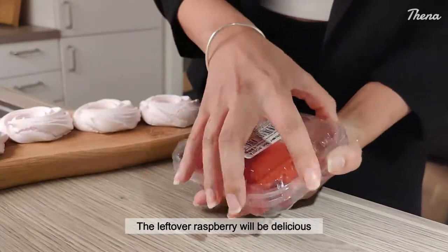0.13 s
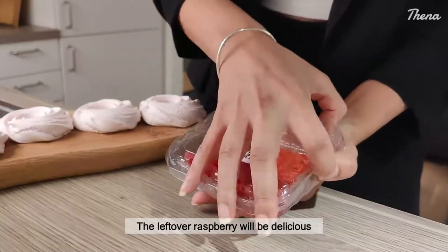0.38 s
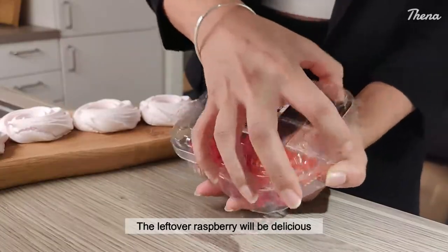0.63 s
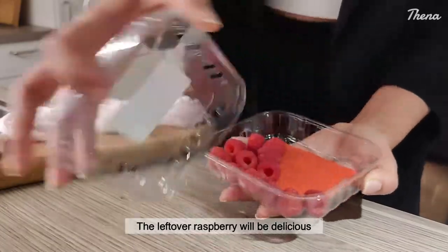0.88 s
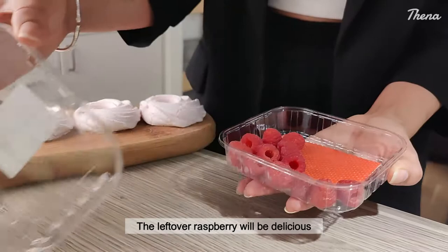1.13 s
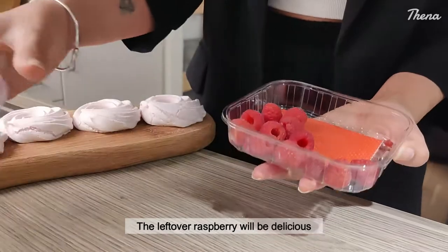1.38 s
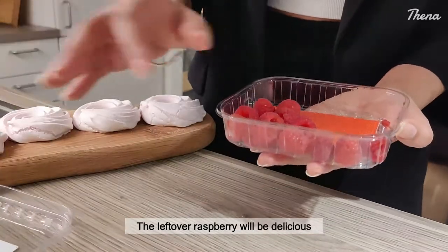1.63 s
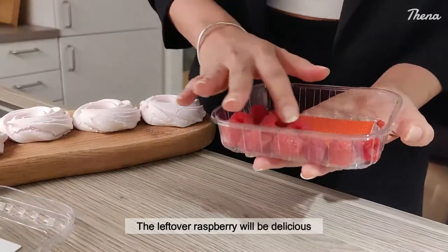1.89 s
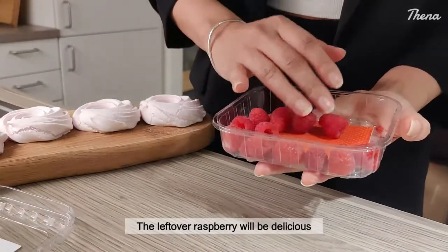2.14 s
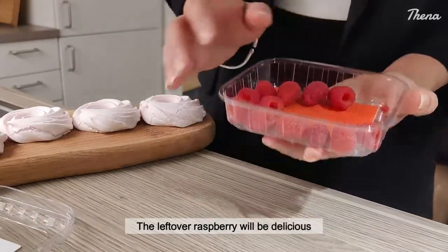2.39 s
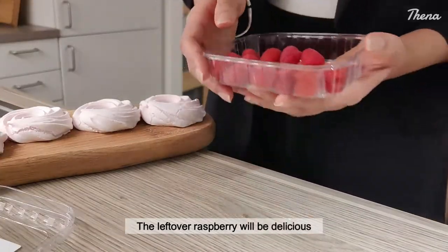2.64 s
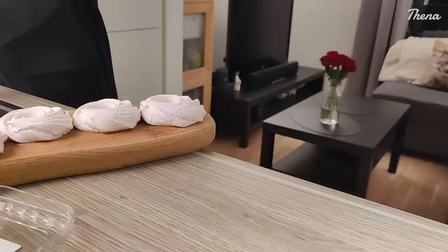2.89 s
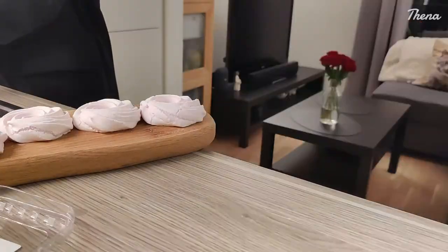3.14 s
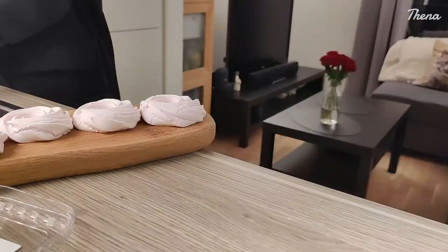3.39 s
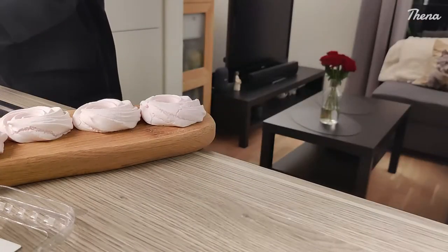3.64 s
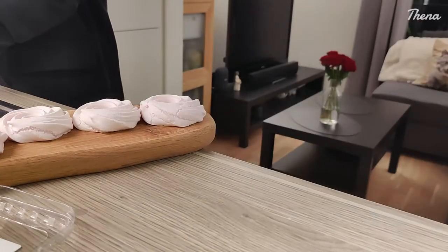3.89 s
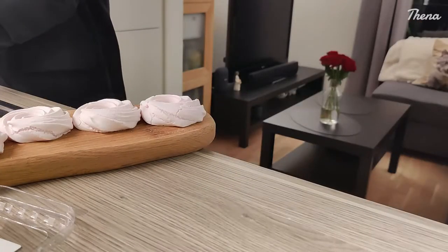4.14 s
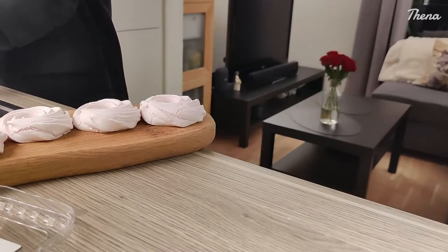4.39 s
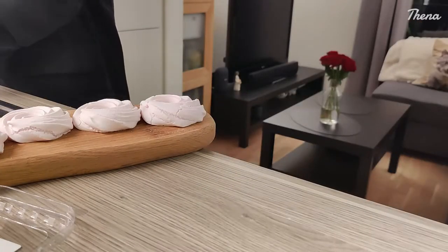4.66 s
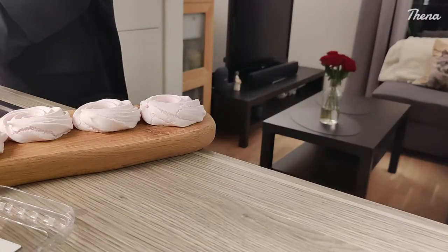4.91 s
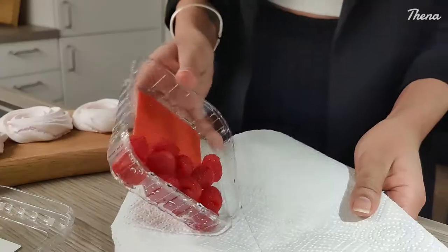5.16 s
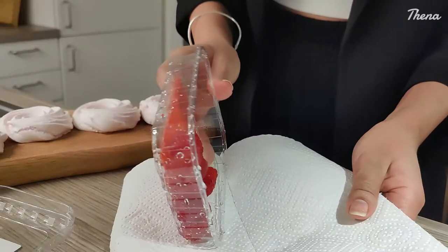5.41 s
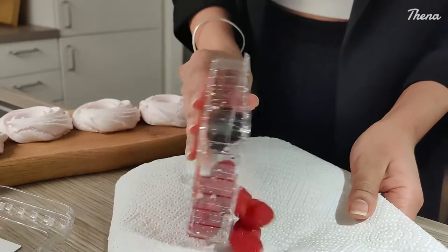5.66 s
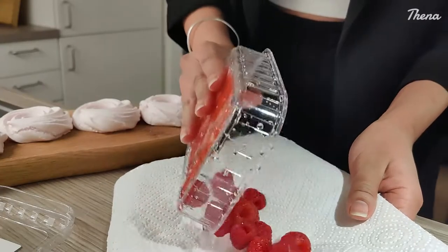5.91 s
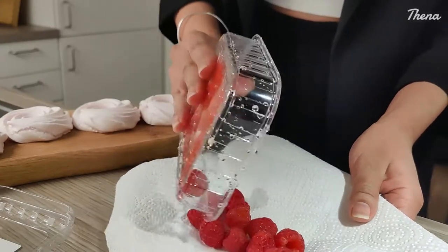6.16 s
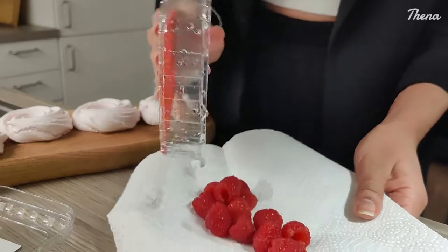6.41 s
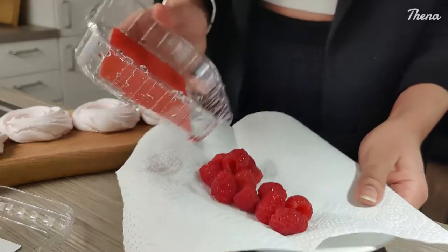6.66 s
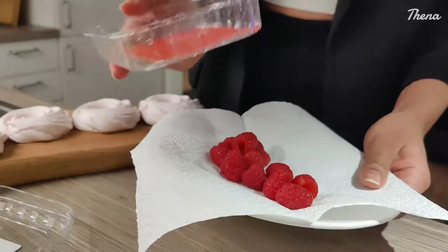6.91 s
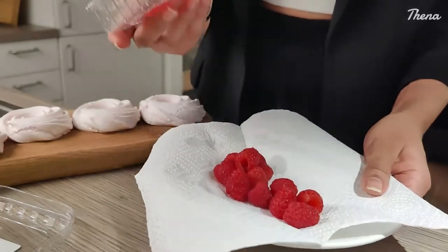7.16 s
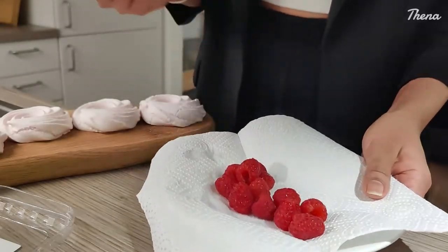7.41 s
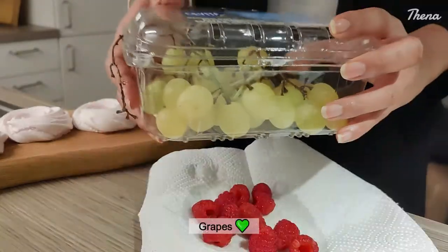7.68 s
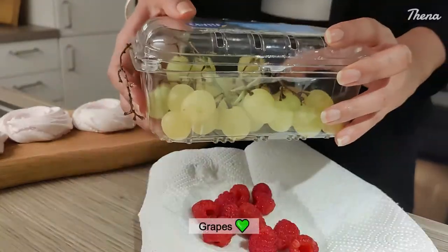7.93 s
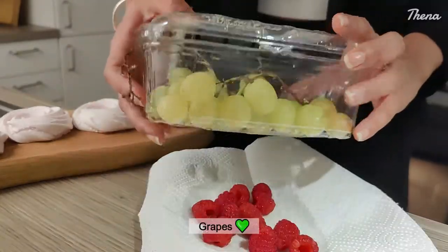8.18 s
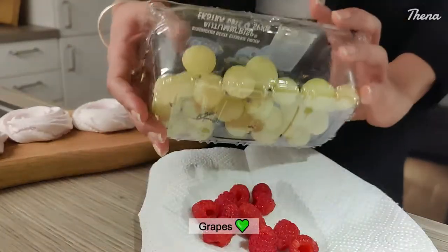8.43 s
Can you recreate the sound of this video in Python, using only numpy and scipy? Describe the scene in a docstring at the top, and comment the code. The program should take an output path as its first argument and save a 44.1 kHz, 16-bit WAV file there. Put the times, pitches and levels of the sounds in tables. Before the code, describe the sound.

Close stereo microphone in a small home kitchen with low appliance hum and faint hiss. Hands rustle a thin plastic berry box, its lid pops sharply, then it clatters lightly on the counter. A tap abruptly sprays into a steel sink for about two seconds, gurgling around the box. Berries drop with dull thuds onto a towel-lined plate, and finally fingers tap and rub another plastic fruit box.

```python
"""A quiet kitchen with a low hum, wavering motor tones and hiss throughout, all filtered noise and sines.
Hands brush thin plastic fruit boxes (swelling noise), lids snap open (noise bursts ringing box modes), and one
is dropped on the counter (slap plus ringing modes). Then a tap sprays into a steel sink (noise and bubble
blips), berries thud onto a plate and fingers tap a box.
Every sound is heard with a faint copy just ahead of it."""
import sys
import numpy as np
from scipy import signal
from scipy.fft import rfft, irfft, next_fast_len
from scipy.io import wavfile
from scipy.ndimage import uniform_filter1d, map_coordinates

SR = 44100
rng = np.random.default_rng(int(sys.argv[2]) if len(sys.argv) > 2 else 0)


def store_wav(level_fs):
    """Save 16-bit WAV to argv[1]."""
    pcm = np.round(np.clip(np.atleast_2d(level_fs), -1, 1) * 32767)
    wavfile.write(sys.argv[1], SR, pcm.T.astype(np.int16))


def attenuation_scalar(level_db):
    """Turn a level in dB into a linear amplitude multiplier (20 dB per decade)."""
    decades = np.asarray(level_db, float) / 20
    return 10 ** decades


N = 377055  # length in samples


def unit(x):
    """Scales a sound to rms 1."""
    return x / np.sqrt(np.mean(x ** 2) + 1e-20)


def along(points, hz):
    """Reads a curve of (Hz, value) points on a log frequency axis."""
    f, v = np.transpose(points)
    return np.interp(np.log(hz + 1), np.log(f + 1), v)


def curves(rows):
    """Gives one value per sample for each column after the time."""
    s, *cols = np.transpose(rows)
    return [np.interp(np.arange(N) / SR, s, c) for c in cols]


def wobble(rate):
    """A smooth random curve with rate knots a second."""
    knots = rng.standard_normal(int(N * rate / SR) + 4)
    return map_coordinates(knots, [np.arange(N) * rate / SR])


def swells(rows, fall_db):
    """Gain of swells (middle s, half length s, dB) that lose fall_db one half length from the middle."""
    now = np.arange(N) / SR
    return np.sqrt(sum(attenuation_scalar(db - fall_db * ((now - s) / half) ** 2) ** 2 for s, half, db in rows))


# How alike the left and right microphone ports sound. Each row: frequency in Hz, likeness from -1 to 1.
LIKENESS = [(60, 0.99), (110, 1), (200, 0.97), (380, 0.61), (700, -0.54), (1290, -0.25), (2380, 0.21),
            (4400, -0.04), (8120, 0.58), (12000, .5), (15000, 0.55)]


def paired(pair, spectrum):
    """Colours two unrelated signals and mixes them to the likeness of the two microphone ports."""
    length = pair.shape[1]
    m = next_fast_len(length + 4096)
    hz = np.fft.rfftfreq(m, 1 / SR)
    turn = np.arccos(np.clip(along(LIKENESS, hz), -1, 1)) / 2
    coloured = rfft(pair, m) * attenuation_scalar(along(spectrum, hz))
    mid, side = irfft(coloured * [np.cos(turn), np.sin(turn)], m)[:, :length]
    return np.array([mid + side, mid - side])


def rush(spectrum, patchy_db, grain_db=0, grains=300, drift_db=0):
    """Stereo noise of rms 1: small patches and slow broad drifts of random gain, plus grains both ports share."""
    z = signal.stft(rng.standard_normal((2, N)), nperseg=256)[2]
    raw = rng.standard_normal((2, *z.shape[1:]))
    field = uniform_filter1d(uniform_filter1d(raw[0], 6, 0), 8, 1)
    drift = uniform_filter1d(raw[1], size=5, axis=0)
    for _ in range(2):
        drift = uniform_filter1d(drift, size=50, axis=1)
    gain = attenuation_scalar(patchy_db * unit(field) + drift_db * unit(drift))
    pair = signal.istft(z * gain, nperseg=256)[1][:, :N]
    return unit(paired(pair * attenuation_scalar(grain_db * wobble(grains)), spectrum))


def band(x, lo_hz, hi_hz):
    """Causal band-pass."""
    return signal.sosfilt(signal.butter(4, [lo_hz, hi_hz], "band", fs=SR, output="sos"), x)


def add(track, s, sound):
    """Lays a stereo sound into the track at time s."""
    part = track[:, round(s * SR):][:, :sound.shape[1]]
    part += sound[:, :part.shape[1]]


# How long the kitchen rings. Each row: frequency in Hz, seconds to fade by 60 dB.
KITCHEN_FADE = [(300, 0.31), (2000, 0.26), (6000, 0.26), (14000, 0.3)]


def room(hit):
    """A fresh stereo noise tail for one hit; each frequency dies at its own speed."""
    hz, t, z = signal.stft(rng.standard_normal((2, SR // 2)), SR, nperseg=256)
    tail = signal.istft(z * attenuation_scalar(-60 * t / along(KITCHEN_FADE, hz)[:, None]), SR, nperseg=256)[1]
    tail = paired(tail, [(100, 0)])
    m = next_fast_len(tail.shape[1] + 2048)
    # the walls hear the object from all sides: they return its broad colour without the narrow peaks
    colour = np.sqrt(np.abs(uniform_filter1d(np.abs(rfft(hit, m)) ** 2, size=m // 60)))
    padded = np.pad(tail, ((0, 0), (300, 0)))
    answer = irfft(rfft(padded, m) * colour, m) / np.linalg.norm(tail[0])
    gather = 1 - np.exp(-(np.arange(m) / SR / 0.004) ** 2)  # reflections gather over about 4 ms
    return (answer * gather)[:, :SR * 2 // 5]


# Colour of the appliance rumble. Each row: frequency in Hz, relative strength in dB per Hz.
HUM_COLOUR = [(24, -42.5), (38, -6.5), (49, 0.5), (60, -6.5), (75, -13), (102, -2), (118, 0), (131, -6.5),
              (140, -21), (172, -13.5), (208, -31.5), (241, -28.5), (347, -44.5), (367, -44), (450, -45.5),
              (580, -80), (990, -120)]
# Colour of the hiss. Each row: frequency in Hz, relative strength in dB per Hz.
HISS_COLOUR = [(300, -19.5), (480, -8), (680, -1), (1050, -5.5), (1500, -3.5), (2070, -1.5), (2500, -7),
               (5500, -7), (7200, -2.5), (9000, -7.5), (12500, -3.6), (14400, 1), (16000, -5.5)]
# Room tone, stepping abruptly to new levels at each start.
# Each row: start in seconds, hum in dB, hiss in dB at the start, fading of the hiss in dB per second.
ROOM_TONE = [(0, -58.5, -77, 1.5), (2.861, -58.5, -81, -4), (5.14, -60, -77, 2), (7.559, -55.5, -75.5, 7)]
# Appliance motor tones. Each row: pitch in Hz, middle peak level in dB.
MOTOR_TONES = [(333.8, -92.5), (683.7, -100), (1044, -101), (2013, -105)]


def background():
    """Appliance rumble in the room's lowest modes, faint wavering motor tones and a hiss."""
    now = np.arange(N) / SR
    row = np.searchsorted([start for start, *_ in ROOM_TONE[1:]], now)
    start, hum_db, hiss_db, fading = np.transpose(ROOM_TONE)[:, row]
    motors = 0
    for hz, db in MOTOR_TONES:
        level = attenuation_scalar(db + 1.2 * wobble(8.3))
        motors = motors + level * np.sin(2 * np.pi * hz * now + 1.7 * wobble(8.3))
    hum = attenuation_scalar(hum_db) * rush(HUM_COLOUR, patchy_db=0.05)
    hiss = attenuation_scalar(hiss_db - fading * (now - start)) * rush(HISS_COLOUR, patchy_db=2.0)
    return hum + hiss + motors


# Hands brushing the boxes; each stroke swells and fades.
# Each row: strongest moment in seconds, half length in seconds, rustle in dB, rubbing in dB above the rustle.
HAND_STROKES = [(0.0, 0.073, -50, -0.8), (0.366, 0.17, -67.5, 9), (2.62, .04, -79, -23),
                (5.293, 0.11, -70, -25), (5.496, 0.037, -66.5, -21), (5.604, 0.084, -63.5, -16.5),
                (5.72, 0.087, -72.5, -1), (5.812, 0.13, -69.5, -5.5), (6.12, 0.064, -90.5, 8),
                (7.78, 0.068, -71.5, -6.5), (7.902, 0.089, -77, -5), (8.03, 0.12, -74, -6),
                (8.166, 0.09, -70, -7), (8.33, 0.12, -70, -3.5), (8.442, 0.13, -68, -7.5)]
# Colour of the rustle. Each row: frequency in Hz, relative strength in dB per Hz.
RUSTLE_COLOUR = [(1000, -39.5), (1700, -14), (2330, -4.5), (3020, -6.5), (4530, -6), (5760, -10.5),
                 (6870, 0), (8980, -11.5), (12500, -9.5), (15500, -12.5)]
# Colour of the duller rubbing. Each row: frequency in Hz, relative strength in dB per Hz.
RUB_COLOUR = [(350, -30), (550, -4.5), (1000, 0.5), (1500, -9.5), (2000, -33)]


def hands():
    """Skin and paper towel brush the plastic: grainy rustle and a duller rubbing in every stroke."""
    fall_db = 15  # loss one half length away from the strongest moment
    rustle = swells([(s, half, db) for s, half, db, _ in HAND_STROKES], fall_db)
    rub = swells([(s, half, db + rub_db) for s, half, db, rub_db in HAND_STROKES], fall_db)
    rustling = rustle * rush(RUSTLE_COLOUR, patchy_db=2.5, grain_db=0.5, grains=610)
    rubbing = rub * rush(RUB_COLOUR, patchy_db=3.5, grain_db=-0.5, grains=47)
    return rustling + rubbing


# Buckling and tapping plastic. Each row: start in seconds, peak of the crackle in dB, then, in dB against
# that peak, the panels; the loudest panel pitch in Hz; the treble in dB against the crackle peak.
SNAP_EVENTS = [(0.036, -58, 12, 1010, 2), (0.0524, -34.5, -32, 2300, -17), (0.1535, -53, -7, 1040, -7),
               (0.195, -53.5, -7, 1260, -10), (0.3504, -14, 0.5, 990, -4), (0.5737, -6.5, -8.5, 1899, -1),
               (0.635, -20, -7, 1250, -24.5), (0.655, -11, -4.5, 960, -5.5),
               (0.6774, -21.5, -25, 2300, -38), (0.8088, -28, -14, 1330, -8.5),
               (0.9848, -47.5, -10.5, 2184, -12), (1.2108, -68.5, -24, 2300, -11.5),
               (1.3482, -50.5, -12, 1500, -7), (1.482, -63.5, -13.5, 2300, 0),
               (1.5603, -23.5, -9, 1335, 4.5), (1.6124, -2.2, -30.5, 900, -9.5),
               (1.6361, -12, -16, 855, -9), (1.694, -18, -27, 2300, -5.5), (1.7128, -22, -24.5, 1500, -12),
               (1.735, -26.5, -20, 1500, -6), (1.7456, -24, -24.5, 1300, -4),
               (1.7614, -26, -26.5, 2200, -16), (1.7848, -32.5, -16, 2200, -29),
               (1.8167, -38.5, -26, 2200, -9), (1.8392, -41, -24, 2200, -32.5), (2.7183, -67, 1, 1480, -16),
               (5.4807, -57.5, -12.5, 1357, -6.5), (5.818, -60.5, 2.5, 1103, 4.5),
               (5.8721, -60, -10, 1100, 2), (6.129, -71, 2.5, 901, 10), (7.6332, -56.5, -20.5, 2300, -18.5),
               (7.7428, -60, 1, 1120, -26.5), (7.8295, -28.5, -15, 2140, -10),
               (7.9467, -27.5, -14, 2200, -12), (8.085, -28.5, -12, 2200, -8),
               (8.211, -31.5, -18.5, 1270, -8.5), (8.2918, -36.5, -20, 2300, -18),
               (8.3037, -49.5, 3.5, 900, -4.5), (8.3787, -26, 3.5, 1500, -36),
               (8.5337, -38, -7, 2300, -23.5)]
# Microphone colour on clicks. Each row: frequency in Hz, gain in dB.
CLICK_COLOUR = [(300, 2.5), (5800, 4.5), (6700, 7), (7900, 8), (8700, -4.5), (13500, -5.5), (16000, -11.5)]
# Ringing modes of the box, varied a little in each snap.
# Each row: middle pitch in Hz, middle level in dB, seconds to fade by 60 dB.
BOX_MODES = [(2370, -1, .018), (3130, -1.5, 0.0089), (4050, 3.5, 0.0059), (4780, 9.5, 0.004),
             (7400, -9, 0.0086), (7450, 0.5, .008)]
# The flat faces of the box. Each row: pitch in Hz, level in dB when struck, seconds to fade by 60 dB.
FACE_MODES = [(847, -11.5, 0.075), (1063, -3.5, 0.033), (1343, -4.5, 0.049), (1480, -1.5, 0.016),
              (2300, 0, 0.043)]


def snaps(wet_db=-6):
    """Each buckle is a flurry of slips within a few ms; it rings the box's modes and its flat faces."""
    t60_s, t60_spread = .038, 0.093  # fade of a flurry; its log spread from snap to snap
    body_hz, body_rise = 2000, .025  # lower edge of crackle at panel -17 dB; octaves up per dB less panel
    face_fall_db = 15.5  # loss per octave away from the panel that was struck
    track, t = np.zeros((2, N)), np.arange(SR // 8) / SR
    for s, db, panel_db, panel_hz, treble_db in SNAP_EVENTS:
        slips = np.repeat(rng.standard_normal(len(t) // 16 + 1), 16)[:len(t)]
        fade = attenuation_scalar(-60 * t / (t60_s * np.exp(t60_spread * rng.normal())))
        shape = (1 - np.exp(-t / .0003)) * fade
        nearby = [[1], [.45]]  # a close source is more alike in both ports than the room
        noise = paired(rng.standard_normal((2, len(t))) * nearby, CLICK_COLOUR)
        burst = noise * attenuation_scalar(4 * slips) * shape
        modes = 0
        for hz, level, life in BOX_MODES:
            ring = attenuation_scalar(level + rng.normal(0, 3) - 60 * t / life)
            modes = modes + ring * np.sin(2 * np.pi * hz * rng.normal(1, .03) * t)
        rung = burst + .03 * signal.fftconvolve(burst, modes[None], axes=1)[:, :len(t)]
        edge = attenuation_scalar(0.33 * (treble_db + 14))  # dull blows lose their upper edge too
        low_hz = body_hz * 2 ** (-body_rise * (panel_db + 17))
        body = band(rung, low_hz, 5900) + edge * band(rung, 5300, 9600)
        faces = 0
        for hz, level, life in FACE_MODES:
            struck_db = level - face_fall_db * abs(np.log2(hz / panel_hz)) + rng.normal(0, 1.4)
            faces = faces + attenuation_scalar(struck_db - 60 * t / life) * np.sin(2 * np.pi * hz * t)
        mono = burst.sum(0)
        panel = 0.064 * band(signal.fftconvolve(mono, faces)[:len(t)], 700, 5000)
        panel += 0.69 * band(mono, 550, 3600)
        treble = band(burst, 8600, 16500)
        sound = body / np.abs(body).max() + attenuation_scalar(panel_db) * panel / np.abs(panel).max()
        sound = attenuation_scalar(db) * (sound + attenuation_scalar(treble_db) * treble / np.abs(treble).max())
        add(track, s, sound)
        add(track, s, attenuation_scalar(wet_db) * room(sound.mean(0)))
    return track


# Soft blows that shake the counter. Each row: start in seconds, ring level in dB, slap in dB above that level.
THUD_EVENTS = [(0.348, -37, -12), (0.655, -48, -12.5), (1.643, -38.5, 5), (1.694, -39, -7),
               (5.5733, -17, 2), (5.611, -20.5, -3), (5.634, -29.5, -4.5), (5.648, -24, -14),
               (8.379, -41.5, 3)]
# Modes of counter and plate. Each row: pitch in Hz, middle level in dB, seconds to fade by 60 dB.
COUNTER_MODES = [(95, -0.5, 0.22), (113.5, -0.5, 0.3), (239, -12.5, 0.16), (331.6, -20.5, 0.28),
                 (638, -15.5, .08), (1080, -22, 0.071), (1500, -30, .06), (2400, -32, .06),
                 (3080, -34.5, 0.11), (4050, -35, 0.14), (7780, -42.5, .08)]
# Colour of the slap. Each row: frequency in Hz, relative strength in dB per Hz.
SLAP_COLOUR = [(300, -19), (500, -5.5), (750, -0.5), (1200, 0.5), (1800, -11.5), (2600, -14), (4000, -23.5),
               (6000, -32), (7800, -27.5), (12000, -46), (16000, -73)]


def thuds(wet_db=-3.5):
    """The contact is a sharp dull slap; the modes of counter and plate swell just after it."""
    slap_t60_s = 0.022
    track, t = np.zeros((2, N)), np.arange(SR // 2) / SR
    for s, db, slap_db in THUD_EVENTS:
        ring = 0
        for hz, level, t60 in COUNTER_MODES:
            fade = attenuation_scalar(level + rng.normal(0, 1.5) - 60 * t / t60)
            ring = ring + fade * np.sin(2 * np.pi * hz * t)
        ring *= attenuation_scalar(db) * (1 - np.exp(-t / 0.0079))
        near, wide = rng.standard_normal(len(t)), rng.standard_normal((2, len(t)))
        centre = paired(np.array([near, 0 * near]), SLAP_COLOUR)
        slap = unit(paired(wide, SLAP_COLOUR) + 0.46 * centre)
        slap *= attenuation_scalar(db + slap_db - 60 * t / slap_t60_s) * (1 - np.exp(-t / 0.00034))
        add(track, s, slap)
        add(track, s + 0.0052, ring * attenuation_scalar([[.6], [-.6]]))  # slightly louder on the left
        add(track, s, attenuation_scalar(wet_db) * room(slap.mean(0)))
    return track


def gurgle(per_s=600):
    """Bubbles in the filling box: soft-starting sines whose pitch rises a little."""
    count = int(per_s * N / SR)
    start, pitch, size, pan = rng.random((4, count))
    hz, t = (520 + 450 * pitch)[:, None], np.arange(900) / SR
    life = t * hz / 8
    blips = np.sin(2 * np.pi * hz * t * (1 + 0.016 * life))
    blips *= life * np.exp(-life * 3) * (0.1 + size[:, None])
    where = ((start * N).astype(int)[:, None] + np.arange(900)).ravel()
    sides = [np.bincount(where, (blips * side[:, None]).ravel())[:N] for side in (pan, 1 - pan)]
    return unit(np.array(sides))


# When the tap is heard: from and to, both in seconds.
TAP_HEARD = (2.8605, 5.1435)
# Strength of the jet. Each row: time in seconds, level in dB.
JET_FLOW = [(2.87, -37.5), (2.98, -41.5), (3.13, -32.5), (3.4, -31), (3.42, -32.5), (3.62, -36),
            (3.79, -34.5), (4.27, -38), (4.49, -35.5), (4.71, -39.5), (5.1, -37.5), (5.13, -35)]
# The jet breaks on an edge. Each row: middle in seconds, swell of the spray in dB.
JET_SPLATS = [(3.057, 4), (3.191, 5.5), (3.37, 4), (3.78, 0.5), (4.33, 4.5), (5.091, 3.5)]
# The jet lands in the box and rings it.
# Each row: middle in seconds, half length in seconds, ring in dB above the flow.
BOX_FILLS = [(3.14, 0.11, -6), (3.6, 0.14, -11), (4.04, .2, -6), (4.35, 0.023, -6.5), (4.62, 0.072, -6.5),
             (4.8, 0.053, -9.5), (4.99, 0.046, -7.5)]
# Water slops in the box and over into the sink.
# Each row: middle in seconds, half length in seconds, gurgle in dB.
WATER_SLOSHES = [(3.24, 0.053, -58), (3.33, 0.084, -54), (3.5, 0.2, -60.5), (3.77, 0.1, -56),
                 (3.88, 0.089, -59.5), (4.27, 0.029, -61), (4.45, 0.16, -65.5), (4.75, 0.017, -60.5),
                 (4.86, 0.068, -66.5)]
# Colours of the fizzing spray, the splatter, the ringing box and the drumming basin.
# Each row of all four: frequency in Hz, relative strength in dB per Hz.
SPRAY_COLOUR = [(3240, -48), (5500, -6.5), (6010, -11), (6550, 0), (7690, 3), (8750, -5), (10100, -4),
                (11800, -6.5), (13900, -3), (15200, -5.5), (16000, -25)]
SPLASH_COLOUR = [(620, -62), (1050, -12), (1350, -5.5), (1690, -13), (2350, -7.5), (3420, -6), (3600, -10),
                 (4680, -58), (7920, -120)]
BOX_COLOUR = [(2060, -31), (3400, -10.5), (3750, -6), (3950, -5), (4200, -6), (4520, -9.5), (5600, -14),
              (7280, -38.5), (12300, -120)]
SINK_COLOUR = [(41, -45), (70, -21), (107, 4), (151, -9), (225, 5), (265, -10.5), (317, -6), (394, -10.5),
               (450, -33.5), (580, -55), (990, -120)]


def tap():
    """The jet fizzes and splatters on fruit and steel; the basin drums below. It cuts in and out abruptly."""
    spray_db, splash_db = 1.5, -16.5  # spray above the flow, splash above the mean flow
    splash_follows = 0.69  # the splash follows the flow only in part
    still_gurgle_db, still_drum_db = -73, -58  # between sloshes
    slosh_drum_db = 8.5  # drumming above the gurgle in a slosh
    flow_db, = curves(JET_FLOW)
    now = np.arange(N) / SR
    running = (now > TAP_HEARD[0]) & (now < TAP_HEARD[1])
    mean_db = flow_db[running].mean()
    slosh = swells(WATER_SLOSHES, fall_db=14.5)
    surge = wobble(30) + sum(db * np.exp(-((now - s) / 0.0062) ** 2) for s, db in JET_SPLATS)
    spray = rush(SPRAY_COLOUR, patchy_db=1.5, grain_db=1.5, grains=350, drift_db=1.4)
    water = attenuation_scalar(flow_db + spray_db + surge) * spray
    splash_level_db = mean_db + splash_db + splash_follows * (flow_db - mean_db)
    splash = rush(SPLASH_COLOUR, patchy_db=3.5, grain_db=0.0, grains=250, drift_db=0.56)
    water += attenuation_scalar(splash_level_db + 0.64 * surge) * splash
    box = rush(BOX_COLOUR, patchy_db=2.3, grain_db=1.0, grains=170, drift_db=-0.83)
    water += swells(BOX_FILLS, fall_db=2) * attenuation_scalar(flow_db + 0.95 * surge) * box
    water += np.hypot(attenuation_scalar(still_gurgle_db), slosh) * gurgle()
    drum = np.hypot(attenuation_scalar(still_drum_db), attenuation_scalar(slosh_drum_db) * slosh)
    water += drum * rush(SINK_COLOUR, patchy_db=0.0)
    return water * running


def scene():
    """All sources at the microphone."""
    return background() + hands() + snaps() + thuds() + tap()


def suppress(x, knee_db=-92, depth_db=-9):
    """Noise suppressor: above the bass, whatever sinks under the knee is turned down, so tails end early."""
    hz, _, z = signal.stft(x, SR, nperseg=512)
    power = uniform_filter1d(uniform_filter1d((np.abs(z) ** 2).mean(0), 9, 0), 3, 1)
    gain = attenuation_scalar(depth_db) + (1 - attenuation_scalar(depth_db)) * power / (power + attenuation_scalar(knee_db) ** 2)
    gain[hz < 350] = 1
    return signal.istft(z * gain, SR, nperseg=512)[1][:, :N]


def roll_off(x):
    """The treble ends steeply here."""
    return signal.sosfilt(signal.butter(12, 17010, fs=SR, output="sos"), x)


def record(dry):
    """Limits the band, suppresses noise and adds a faint copy of the sound that runs 17 ms ahead of it."""
    bottom_hz, top_hz = 38.46, 15850
    ahead_samples, ahead_db = 769, -16.5
    low_cut = signal.butter(6, bottom_hz, "high", fs=SR, output="sos")
    high_cut = signal.cheby1(12, .3, top_hz, fs=SR, output="sos")
    heard = suppress(signal.sosfilt(np.vstack([low_cut, high_cut]), dry))
    ahead = np.pad(heard[:, ahead_samples:], ((0, 0), (0, ahead_samples)))
    return roll_off(heard + attenuation_scalar(ahead_db) * ahead)


dry = scene()
out = record(dry)
store_wav(out)
```